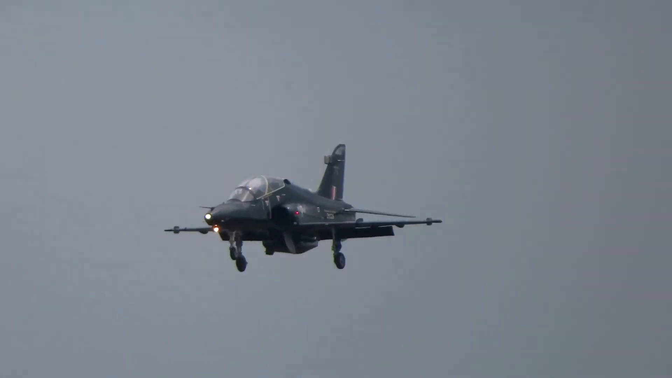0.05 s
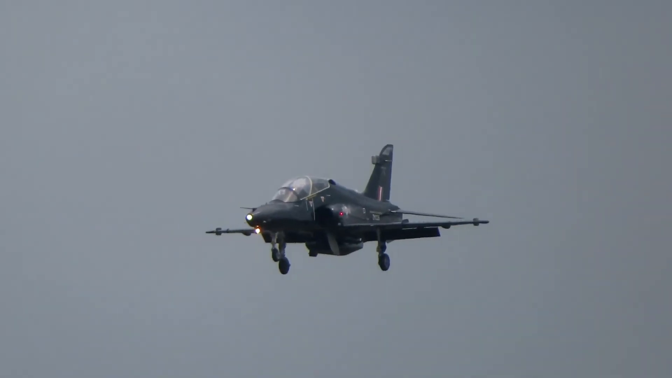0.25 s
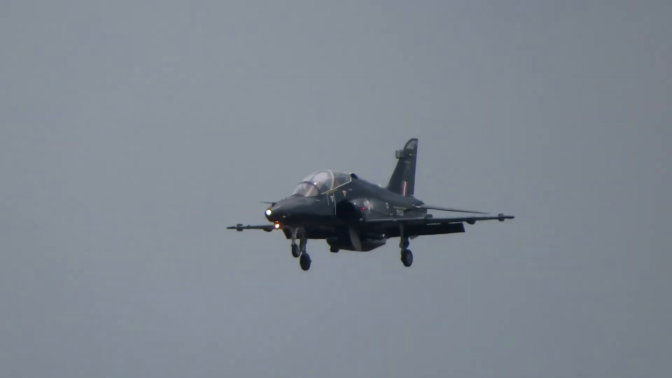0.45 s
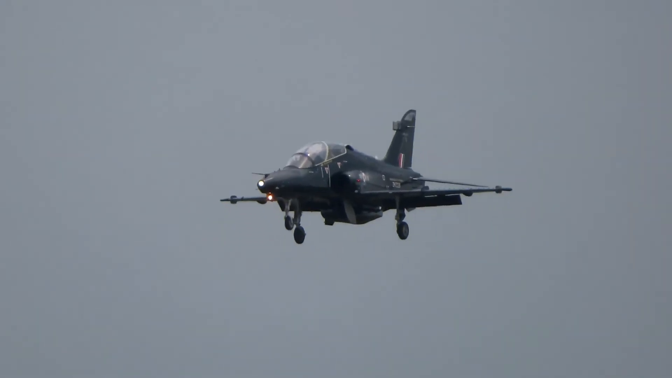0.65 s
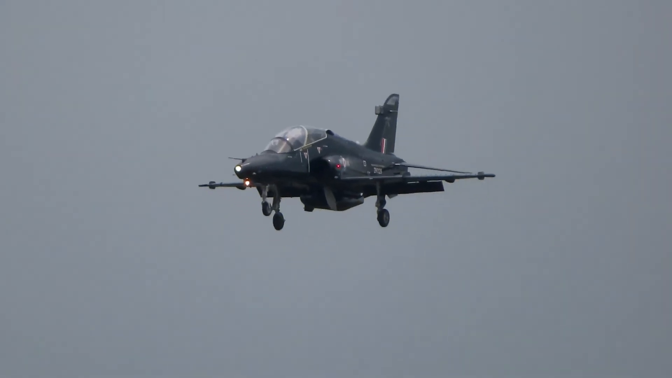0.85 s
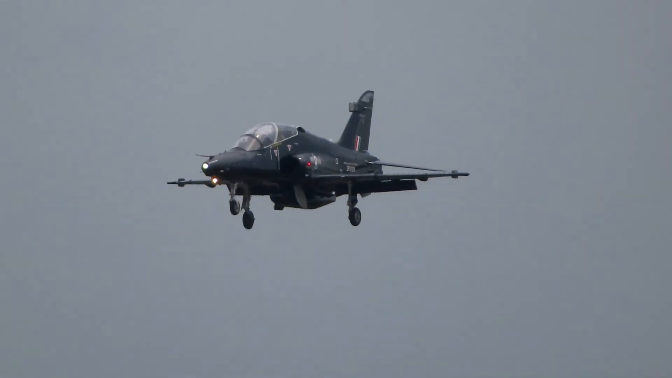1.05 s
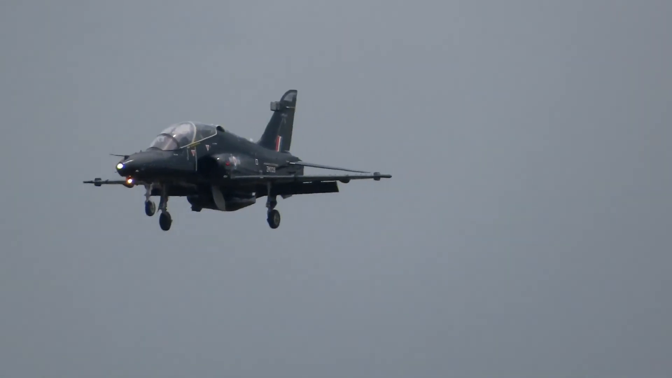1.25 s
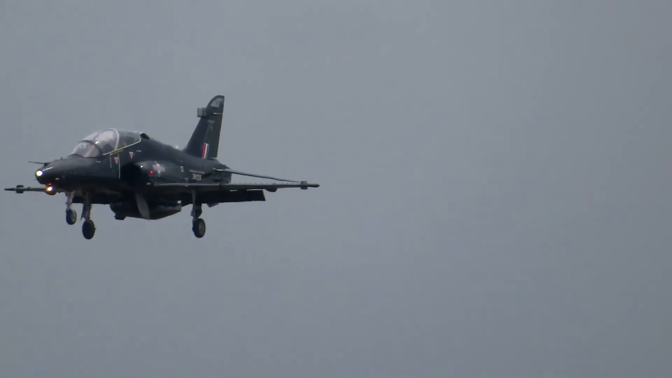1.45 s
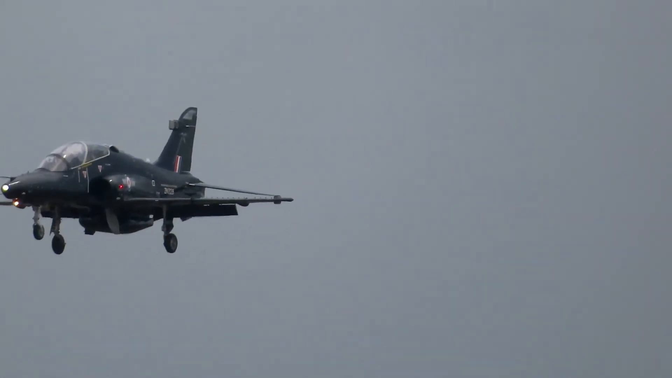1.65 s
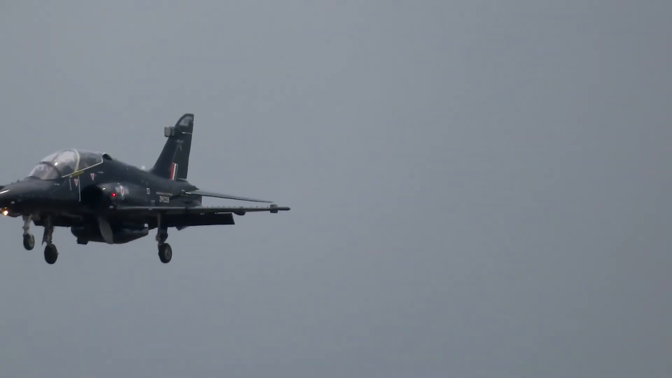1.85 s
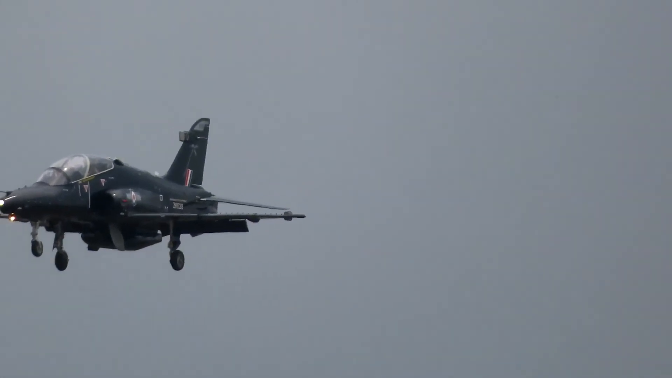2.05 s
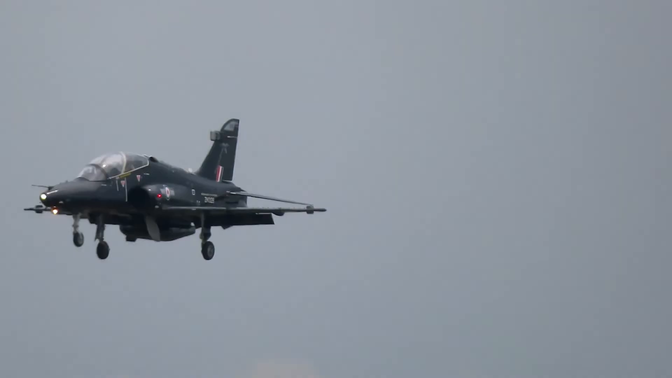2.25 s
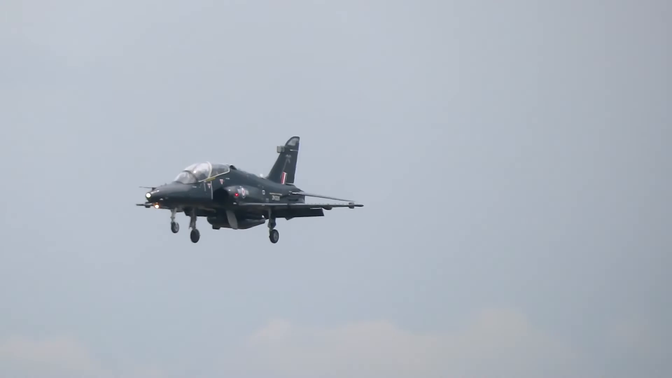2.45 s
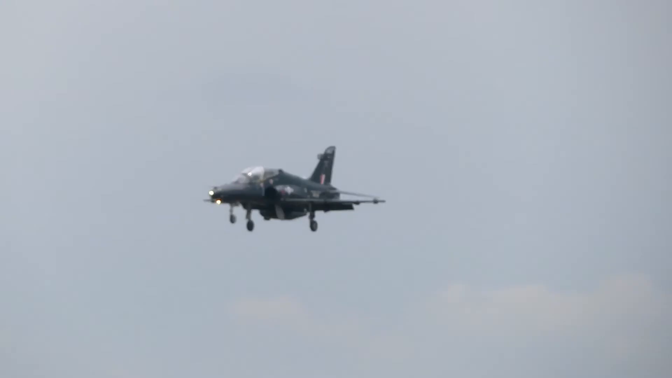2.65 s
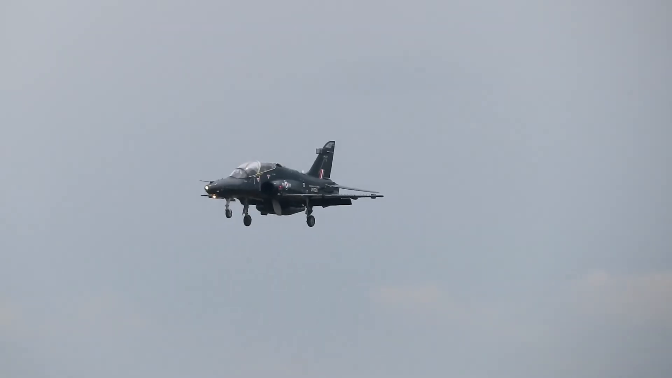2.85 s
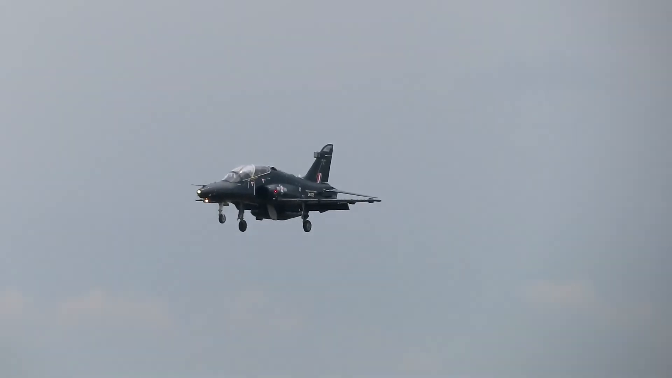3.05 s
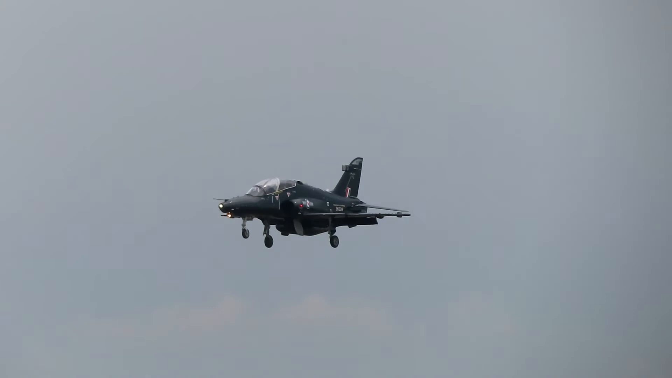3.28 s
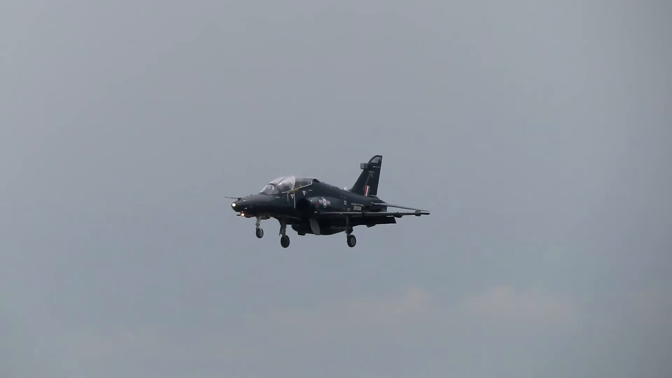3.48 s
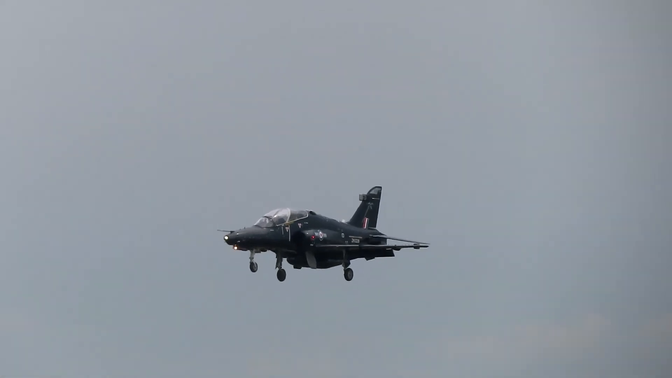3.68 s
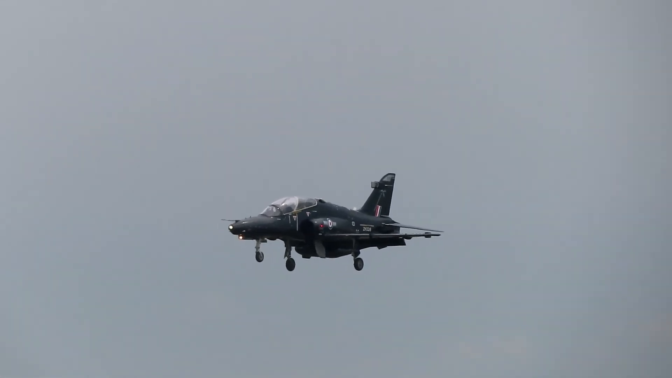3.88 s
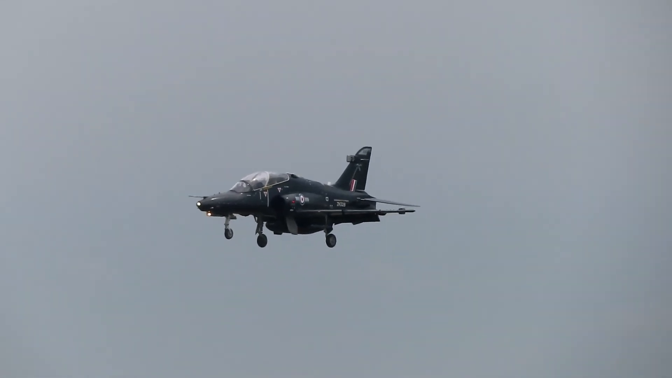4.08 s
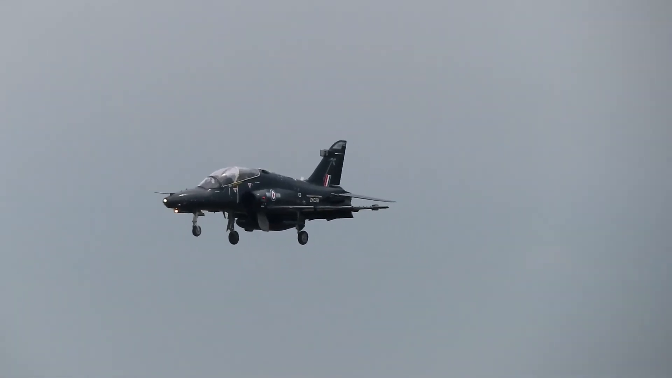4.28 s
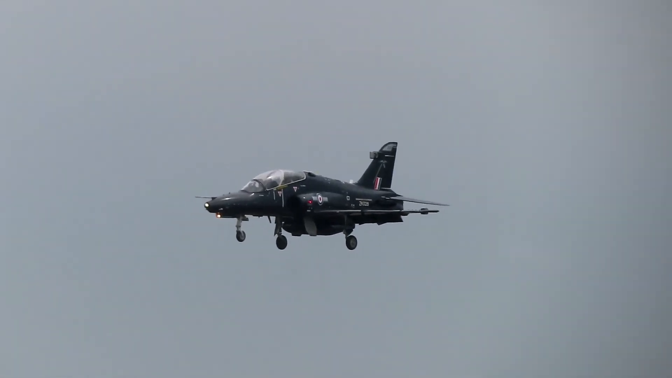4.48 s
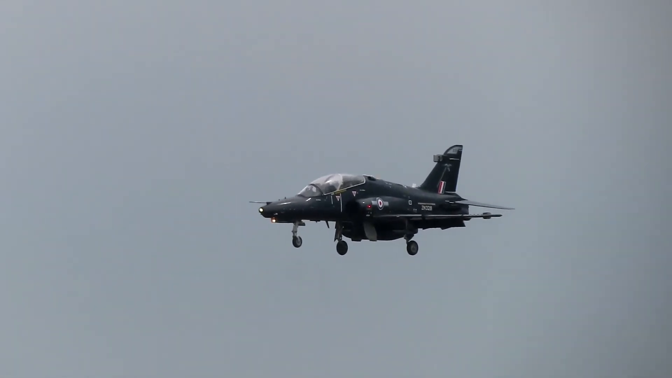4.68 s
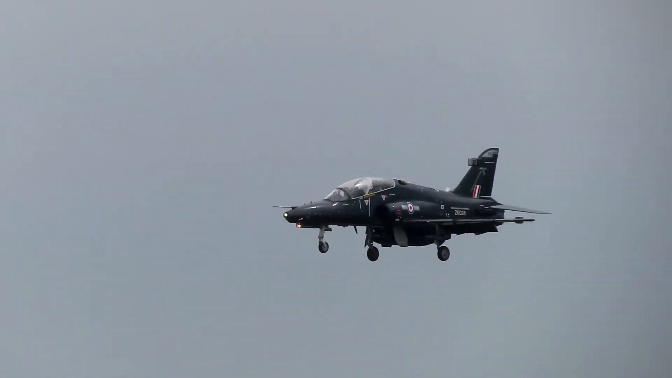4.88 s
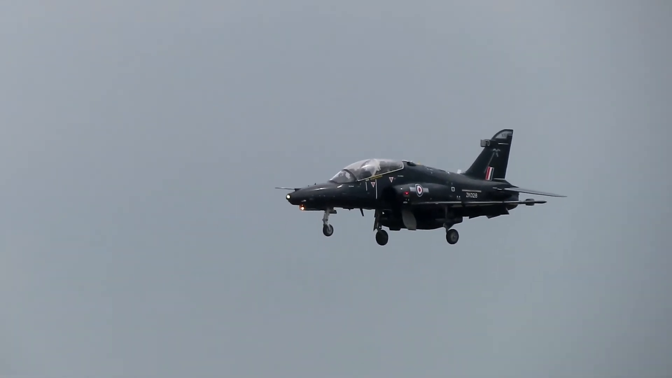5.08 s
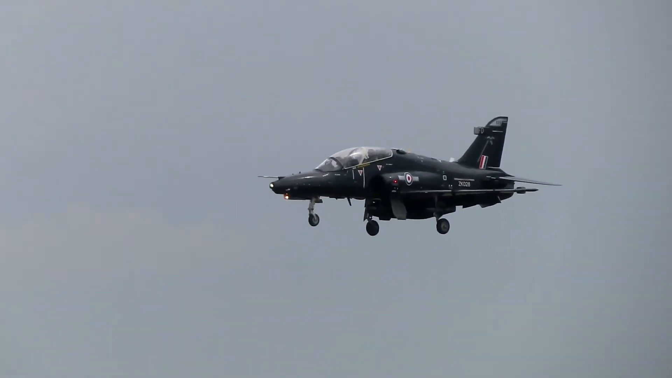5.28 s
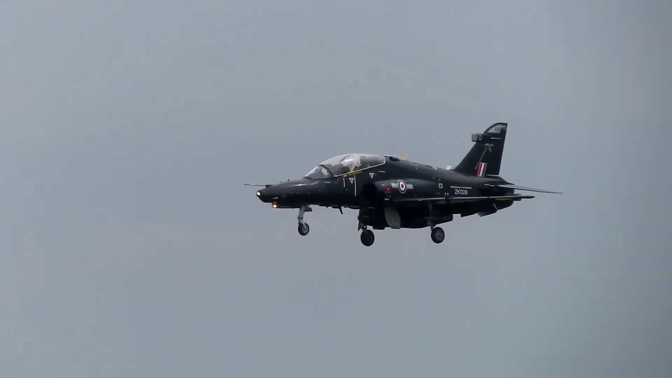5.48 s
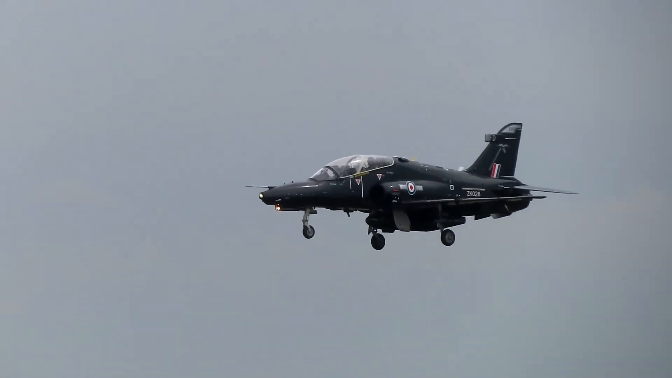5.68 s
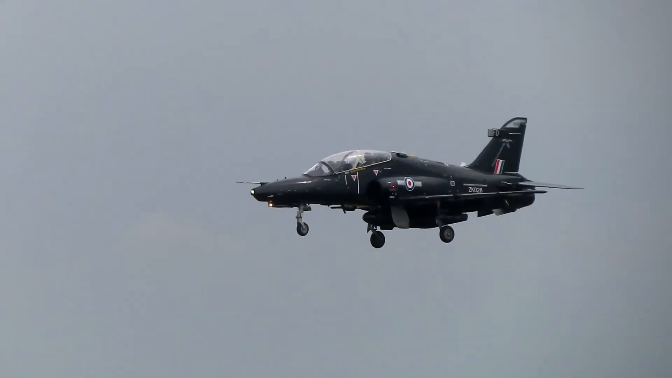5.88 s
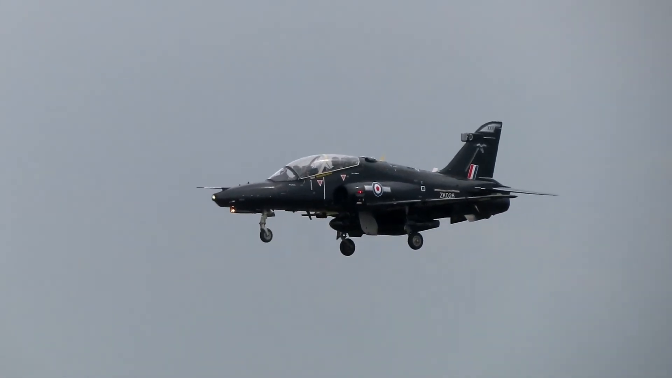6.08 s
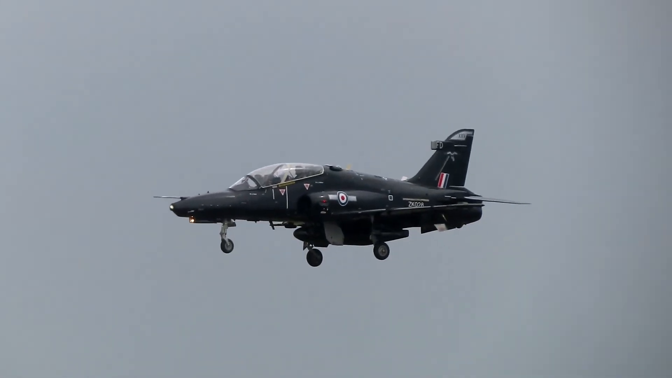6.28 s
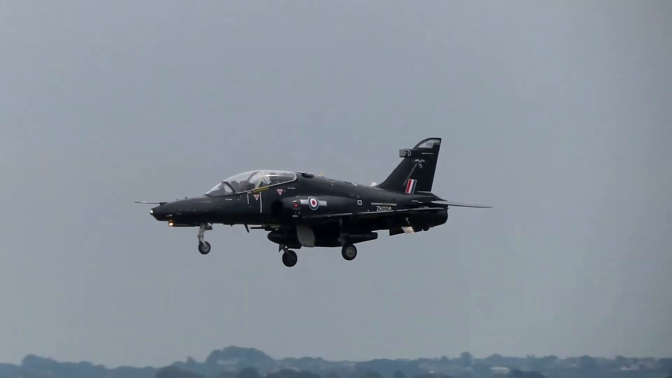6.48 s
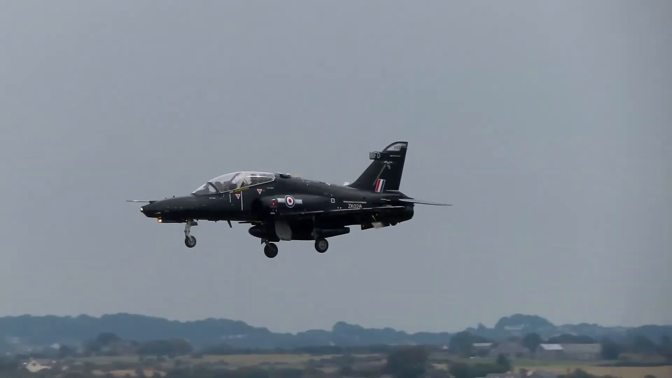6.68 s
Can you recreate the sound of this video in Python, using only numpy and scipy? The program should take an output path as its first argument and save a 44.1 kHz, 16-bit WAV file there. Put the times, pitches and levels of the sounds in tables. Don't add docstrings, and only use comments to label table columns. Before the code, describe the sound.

Outdoor camcorder sound of a small jet on landing approach, nearly centred with modest stereo width. From 0 s a turbulent, airy exhaust roar falls back slightly, its mids and treble flickering in patches, hollowed by reflections off grass. A thin fan whine around 4.5 kHz flutters, climbing to about 5.3 kHz by 2.3 s. Soft wind buffets low down. Tiny shutter clatters occur near 0.4, 1.3, 1.6, 3.1, 3.5, 3.9, 4.2 and 4.7 s. At 2.25 s a zoom button clicks, followed by a faint motor hum until 2.9 s; a tiny falling whistle passes at 2.8 s. The roar thickens from 3.5 s and surges near 5 s. The whine flares sharply, strongest from 5.4 to 6.3 s, slipping slightly lower in pitch. The roar peaks bright and full around 6.3 s amid stronger wind, then eases by 6.7 s.

```python
import sys
import numpy as np
from scipy import signal
from scipy.fft import rfft, irfft, next_fast_len
from scipy.io import wavfile
from scipy.ndimage import uniform_filter1d

SR = 44100
rng = np.random.default_rng(int(sys.argv[2]) if len(sys.argv) > 2 else 0)


def nominal_scale(level):
    x = np.asarray(level, float) / 20
    return 10 ** x


def dump_mix(stems):
    frames = np.atleast_2d(stems).T
    limited = np.clip(frames, -1, 1)
    pcm = np.round(limited * 32767).astype(np.int16)
    wavfile.write(sys.argv[1], SR, pcm)


N = 296793
T = np.arange(N) / SR
COARSE = T[::64]
SIZE = next_fast_len(N)
HZ = np.arange(SIZE // 2 + 1) * SR / SIZE + 1e-3

# [t/s, level/dB, presence of the mids/dB, brightness/(dB per octave)]
APPROACH = [(0.0, -30, 5.5, -2.8), (0.18, -35, 9, -0.2), (0.64, -36, 4, 0.5), (1.36, -31.5, 0.2, -1.03),
            (1.66, -32.5, 8.5, -1.9), (1.88, -28.5, 5, 0.4), (2.44, -35, 11.5, -1.4),
            (2.76, -33.5, 0.7, -0.14), (3.34, -32, -1, -0.6), (3.56, -30, 0.1, 0),
            (4.08, -27.0, -0.5, -0.7), (4.32, -30, 0.5, 0.1), (4.48, -29.5, -5.5, -0.74),
            (5.02, -20, -4, 1.1), (5.18, -23, 3, 1.1), (5.52, -19.5, -7.5, 0.75), (6.32, -15.5, -0.6, 1.1),
            (6.73, -23, -4, -0.9)]
# [t/s, f/Hz, steady level/dB]
FAN_TONE = [(0.0, 4610, -54), (0.87, 4440, -58), (1.0, 4560, -63), (1.15, 4700, -61), (1.4, 5030, -59),
            (1.9, 5120, -58), (2.3, 5300, -58), (2.62, 5275, -67), (2.95, 5030, -60), (3.35, 5055, -63),
            (3.65, 5020, -55), (4.25, 4980, -51), (4.45, 5090, -53), (4.73, 5345, -52), (5.08, 5360, -45),
            (5.36, 5100, -40.5), (5.95, 4975, -38), (6.73, 4884, -42)]


def roar():
    # [f/Hz, level/(dB per Hz)]
    jet_spectrum = [(30, -34), (70, -16.5), (150, -3.5), (300, -2.5), (800, -2.5), (1500, -2), (2200, -7.5),
                    (3000, -15), (4200, -20), (4900, -23.5), (5500, -31), (6200, -43.5), (9000, -76)]
    # [f/Hz, level/dB]
    spread = [(60, -41), (200, -65.5), (500, -30.5), (1000, -35), (2200, -21), (3600, -25), (6000, -20.5),
              (10000, -8.5)]
    # [lowest f/Hz, highest f/Hz]
    roar_bands = [(130, 500), (600, 1200), (1300, 2800), (3000, 4300)]
    roar_trim = [0.75, -1.6, -3, -12.5]
    power = nominal_scale(2 * colour(jet_spectrum, HZ)) / len(HZ)
    trim_db = [db - 10 * np.log10(power[(HZ > low) & (HZ < high)].sum())
               for db, (low, high) in zip(roar_trim, roar_bands)]
    centres = np.log2([np.sqrt(low * high) for low, high in roar_bands])
    white = rfft(rng.standard_normal((2, SIZE))) * np.sqrt(power * len(HZ))
    white[1] *= nominal_scale(colour(spread, HZ))
    calm = np.interp(COARSE, [5.6, 6.2], [1, .45])
    puff, patch = drift(40), drift(10)
    total = 0
    for octave in np.arange(6, 12.9, 1 / 6):
        window = np.cos(np.pi / 2 * np.clip(6 * (np.log2(HZ) - octave), -1, 1)) ** 2
        level_db = np.interp(octave, centres, trim_db) + heard(2 ** octave)
        patch = 0.75 * patch + 0.7 * drift(7.3)
        shimmer = calm * np.clip((octave - 8.5) / 2.64, .15, 1.2)
        flicker_db = shimmer * (.7 * puff + .55 * patch + 2.2 * drift(35)) - .9
        band = irfft(white * window, SIZE)[:, :N]
        total = total + band * np.interp(T, COARSE, nominal_scale(level_db + flicker_db))
    return total


def heard(hz):
    s, level_db, presence_db, tilt_db = np.transpose(APPROACH)
    presence_hz, presence_octaves, pivot_hz = 1237, 0.94, 980
    presence = np.exp(-(np.log2(hz / presence_hz) / presence_octaves) ** 2)
    db = level_db + presence_db * presence + tilt_db * np.log2(max(hz, 150) / pivot_hz)
    return np.interp(COARSE, s, db) + pockets(hz)


def pockets(hz):
    # [t/s, half length/s, f/Hz, level/dB]
    air_pockets = [(0.295, 0.053, 4470, 5), (0.352, 0.17, 517, 5.5), (0.406, 0.11, 3180, 8.5),
                   (0.61, 0.48, 825, -4.5), (0.107, 0.087, 2900, 5), (0.9, 0.26, 1410, 4),
                   (1.15, 0.18, 2520, 4.5), (1.326, 0.088, 1655, -4), (1.69, 0.12, 3600, -3.5),
                   (2.04, 0.3, 536, -3.5), (2.033, 0.24, 3000, 6), (2.55, 0.23, 3070, 8),
                   (2.539, 0.098, 442, 2.5), (2.58, 0.17, 4500, -4), (2.927, 0.14, 3800, 5),
                   (3.1, 0.12, 840, 5), (3.194, 0.22, 460, -8), (3.418, 0.095, 4400, 0.5),
                   (4.2, 0.12, 1570, 3.5), (4.22, 0.072, 217, 7), (4.214, 0.31, 556, -8.5),
                   (4.49, 0.1, 897, 6.5), (4.503, 0.17, 152.4, 6), (5.114, 0.15, 3900, -3.5),
                   (5.155, 0.14, 1930, -5.5), (5.17, 0.26, 780, 2), (5.394, 0.078, 2900, 3.5),
                   (5.859, 0.13, 2740, -1.5), (5.8, 0.53, 676, 2.5), (6.293, 0.06, 206, -11)]
    # [t/s, half length/s, f/Hz, level/dB, climb/(octaves per s)]
    air_fronts = [
        (1.675, 0.32, 1900, 2, 4),
        (5.1, 0.17, 1050, 2.5, 1.5),
        (6.07, .2, 2030, 3, 1.8),
        (6.24, 0.06, 4800, 5.5, -14),
        (.02, 0.18, 1600, 3.5, -6),
    ]
    pocket_octaves = 0.55
    rows = [*[(*row, 0) for row in air_pockets], *air_fronts]
    s, half_s, centre_hz, db, climb = np.transpose(rows)[..., None]
    late = COARSE - s
    off = np.log2(hz / centre_hz) - climb * late
    return (db * np.exp(-(off / pocket_octaves) ** 2 - (late / half_s) ** 2)).sum(axis=0)


def rush():
    slope = nominal_scale(-26 * np.log2(1 + HZ / 2500.0)) / np.sqrt(1 + (5500 / HZ) ** 16)
    air = unit(shaped(rng.standard_normal((2, N)), slope / (1 + (HZ / 7950.0) ** 6)))
    rush_hz, rush_db = 6500, -31
    growth = 1.03
    flare_share = 0.19
    flare_db = flares()
    jet_db = growth * (heard(rush_hz) + 28) - 28
    db = rush_db + np.interp(T, COARSE, jet_db + 2.0 * drift(35))
    flare = flare_share * (flare_db - uniform_filter1d(flare_db, SR // 2))
    return air * nominal_scale(db + flare + 2.0 + np.array([[0], [-11.5]]))


def fan():
    hz, db = curve(FAN_TONE)[0], flares()
    spool_s = .14
    phase = 2 * np.pi * np.cumsum(uniform_filter1d(hz, int(spool_s * SR))) / SR
    depth_db = np.interp(T, [4.2, 4.6, 5.25, 5.4, 5.9, 6.05], [3.5, 2.5, 2.5, 4.5, 4.5, 2.3])
    veil_db = np.interp(T, [5.15, 5.3, 5.9, 5.97], [0, -5, -6, 0])
    tone = np.sqrt(2) * np.sin(phase + .4 * depth_db * walk(60))
    tone = tone * nominal_scale(db + veil_db + depth_db * (walk(64) - .5))
    skirt = noise(5, 70) * np.sin(phase + 1) * nominal_scale(-3.5 + veil_db)
    octave_db = 1.4 * uniform_filter1d(db, SR // 4) - 19.5
    octave = noise(5, 320) * np.sin(2 * phase) * nominal_scale(octave_db)
    intake_db = -1 + 3.0 * walk(40) + np.interp(T, COARSE, pockets(4600))
    intake = noise(5, 380, order=4) * np.sin(.94 * phase) * nominal_scale(intake_db)
    return tone + octave + swish() + (skirt + intake) * nominal_scale(uniform_filter1d(db, SR // 20))


def flares():
    # [t/s, peak level/dB, hold/s]
    tone_flares = [(.09, -44, 0.028), (.3, -39, 0), (.69, -46.5, 0), (.85, -46.5, 0.0066), (1.1, -44, 0),
                   (2.075, -49, 0), (2.3, -43, 0), (2.47, -51.5, 0.02), (2.58, -54, 0.0077),
                   (2.65, -50.5, 0.028), (3.82, -46, 0), (4.07, -43, 0.0099), (4.535, -43, 0.03),
                   (4.669, -41.5, 0.047), (4.8, -41, 0), (4.854, -40, 0.042), (4.964, -33, 0.018),
                   (5.07, -39.5, 0.046), (5.259, -41, 0.0024), (5.435, -29.5, 0), (5.502, -31, 0),
                   (5.607, -28.5, 0), (5.737, -33, 0.017), (5.832, -30, 0.015), (5.976, -27.5, 0),
                   (6.031, -29, 0), (6.162, -31, .18), (6.39, -31, 0.035), (6.544, -36, 0.067),
                   (6.68, -33, 0.0028)]
    s, peak_db, hold_s = np.transpose(tone_flares)
    flare_db = swells(s, peak_db, hold_s[:, None], rise_db_s=422, fall_db_s=327)
    return np.maximum(curve(FAN_TONE)[1], flare_db)


def swish():
    late = T - 2.83
    start_hz, drop_hz_s, half_s = 4750, 8950, .035
    whistle = np.sin(2 * np.pi * late * (start_hz - drop_hz_s * late / 2))
    return whistle * nominal_scale(-42) * np.exp(-(late / half_s) ** 2)


def ground(x):
    # [t/s, grass delay/ms, grass strength/(0 to 1), body delay/ms]
    bounces = [(0, 1.8, 0, 0.85), (.6, 1.48, 0.37, 0.89), (1.2, 1.55, 0.07, 0.91), (2, 1.624, 0.74, 0.907),
               (2.7, 1.65, 1, 0.94), (3.5, 1.615, 0.7, 0.89), (4.2, 1.52, 0.68, 1.025), (4.6, 1.8, 0.68, 1),
               (5, 1.583, 0.47, 0.992), (5.8, 1.79, 0.35, 1.07), (6.3, 1.75, 0.7, 0.99),
               (6.73, 1.7, 0.23, 1.03)]
    grass_ms, strength, body_ms = curve(bounces)
    dull = shaped(x, np.sqrt(0.039 + 0.69 / (1 + (HZ / 1000.0) ** 4)))
    bright = shaped(x, .39 / np.sqrt((1 + (1700 / HZ) ** 6) * (1 + (HZ / 4800) ** 8)))
    near = T - (grass_ms - .1 + .035 * walk(12)) / 1000
    far = T - (grass_ms + .1 + .035 * walk(12)) / 1000
    bounce = np.array([np.interp(near, T, d) + np.interp(far, T, d) for d in dull]) / 2
    slap = np.array([np.interp(T - body_ms / 1000, T, b) for b in bright])
    return x - strength * bounce + slap


def wind():
    # [t/s, peak level/dB, part that differs between the ports/dB]
    gusts = [(0.0, -26, -47), (.99, -38, -75), (1.14, -35.5, -66), (1.31, -40, -76), (1.42, -36.5, -74),
             (1.61, -39, -67), (1.85, -30, -70), (2.02, -34.5, -58), (2.19, -26.5, -55), (2.38, -32.5, -81),
             (2.5, -28.5, -52), (2.81, -38.5, -85), (3.04, -39, -90), (3.18, -41, -90), (3.6, -37, -70),
             (3.78, -43, -90), (4.16, -36, -52), (4.46, -38, -51), (4.67, -28.5, -44), (4.85, -32, -40),
             (4.95, -31, -50), (5.23, -39, -50), (5.55, -28, -40), (5.72, -37, -40), (5.88, -27.5, -44),
             (6.13, -28, -36), (6.22, -22, -23), (6.35, -22.5, -27), (6.48, -27.5, -28), (6.69, -39, -50)]
    s, db, unlike_db = np.transpose(gusts)
    level_db = curve(APPROACH)[0]
    rise_db_s, fall_db_s = 221, 191
    breeze_db = -47.5 + 1.2 * (level_db + 27)
    eddy_db = -70 + 2.4 * (level_db + 27.5)
    buffet_db = np.maximum(swells(s, db, 0, rise_db_s, fall_db_s), breeze_db)
    unlike_db = np.maximum(swells(s, unlike_db, 0, rise_db_s, fall_db_s), eddy_db)
    buffet = noise(40, 123, order=3) * nominal_scale(buffet_db + 3.0)
    return buffet, noise(45, 170) * nominal_scale(unlike_db + 2.3 * walk(20))


def camcorder():
    # [t/s, f/Hz, level/dB]
    zoom = [(2.3, 400, -62), (2.4, 436, -51), (2.46, 455, -50), (2.5, 410, -47), (2.57, 439, -42),
            (2.62, 415, -46), (2.7, 428, -50), (2.78, 427, -58), (2.9, 410, -72)]
    # [t/s, peak level/dB]
    button = [
        (2.240, -30),
        (2.256, -25),
        (2.264, -25.5),
        (2.270, -27),
    ]
    hz, db = curve(zoom)
    phase = 2 * np.pi * np.cumsum(hz * (1 + .015 * walk(25))) / SR
    motor = np.sin(phase) + nominal_scale(-4 + 3.1 * walk(20)) * np.sin(2 * phase)
    motor = motor + nominal_scale(-26.5) * noise(700, 1600)
    running = (T > 2.3) * (T < 2.9)
    press = shaped(clicks(button, 300, 2600, 0.0051), 1 / (1 + (HZ / 3900.0) ** 4))
    return np.sqrt(2) * motor * nominal_scale(db) * running + 0.66 * press


def cameras():
    # [t/s, peak level/dB]
    shutter = [(0.464, -46.5), (1.3806, -44), (1.682, -48), (3.1823, -43), (3.5606, -41.5), (3.923, -42),
               (4.276, -42.5), (4.7136, -41.5)]
    # [t from last blade/s, level/dB]
    shutter_parts = [
        (-.124, -7),
        (-.105, -20),
        (-.048, -4),
        (0, 3),
        (.011, -4),
        (.018, -16),
    ]
    # [t/s, level/dB, hold/s]
    focus_moves = [(.67, -72, .01), (0.738, -70, .01), (.81, -67.5, .19), (1.55, -77, .11),
                   (3.98, -75, .25)]
    ticks = [(s + lag, db + part_db - 7.5) for s, db in shutter for lag, part_db in shutter_parts]
    s, db, hold_s = np.transpose(focus_moves)
    focus_db = swells(s, db, hold_s[:, None], rise_db_s=501, fall_db_s=501)
    focus = noise(13500, 15200, order=8) * nominal_scale(focus_db + 2.5 * walk(29))
    return clicks(ticks, 4000, 11000, 0.0021), focus


def hiss():
    # [f/Hz, level/(dB per Hz)]
    hiss_spectrum = [(2000, -17.5), (6000, -8), (9000, -0.5), (12000, -5), (15500, -10)]
    duck_db = -1.1 * np.clip(uniform_filter1d(curve(APPROACH)[0], SR // 2) + 28, 0, 20)
    preamp = unit(shaped(rng.standard_normal((2, N)), nominal_scale(colour(hiss_spectrum, HZ))))
    return preamp * nominal_scale(-68.5 + duck_db)


def clicks(rows, lo_hz, hi_hz, decay_s):
    s, db = np.transpose(rows)
    marks = np.zeros(N)
    np.add.at(marks, (s * SR).astype(int), nominal_scale(db))
    decay = np.exp(-1 / (decay_s * SR))
    return signal.lfilter([1], [1, -decay], marks) * noise(lo_hz, hi_hz)


def swells(s, db, hold_s, rise_db_s, fall_db_s):
    late = COARSE - s[:, None]
    top = db[:, None] - rise_db_s * np.maximum(-late, 0) - fall_db_s * np.maximum(late - hold_s, 0)
    return np.interp(T, COARSE, top.max(axis=0))


def drift(rate):
    k = int(SR / 64 / rate)
    steps = np.repeat(rng.standard_normal(480), k)
    smooth = uniform_filter1d(uniform_filter1d(steps, k), k)[:len(COARSE)]
    return unit(smooth - smooth.mean())


def walk(rate):
    return np.interp(T, COARSE, drift(rate))


def noise(lo_hz, hi_hz, order=2):
    low_edge = 1 + (lo_hz / HZ) ** (2 * order)
    high_edge = 1 + (HZ / hi_hz) ** (2 * order)
    return unit(shaped(rng.standard_normal(N), 1 / np.sqrt(low_edge * high_edge)))


def curve(table):
    s, *columns = np.transpose(table)
    return [np.interp(T, s, c) for c in columns]


def colour(table, hz):
    f, db = np.transpose(table)
    return np.interp(np.log(hz), np.log(f), db)


def shaped(x, gain):
    return irfft(rfft(x, SIZE) * gain, SIZE)[..., :N]


def unit(x):
    return x / np.sqrt(np.mean(x ** 2))


def scene():
    # [f/Hz, width/Hz, level/dB]
    resonances = [(446, 240, -2), (889, 200, 3), (1220, 320, -7), (1988, 330, -4.5), (3830, 260, -2.5),
                  (4370, 170, -3.5)]
    housing = nominal_scale(sum(db / (1 + (2 * (HZ - hz) / width) ** 2) for hz, width, db in resonances))
    aircraft = ground(roar()) + rush() + fan() * np.array([[1], [.08]])
    jet, scattered = shaped(aircraft, housing)
    lag_us, tilt_db = 11.5, -0.32
    offset = np.exp(-1j * np.pi * HZ * lag_us * 1e-6) * nominal_scale(tilt_db * np.log2(1 + HZ / 400.) / 2)
    buffet, eddies = wind()
    ticks, focus = cameras()
    mid = buffet + ticks + focus
    side = scattered + eddies + camcorder() + .55 * ticks + .6 * focus
    left = shaped(jet, offset) + mid + side
    right = shaped(jet, 1 / offset) + mid - side
    return np.array([left, right]) + hiss()


def band_limit(x):
    return signal.sosfilt(signal.butter(12, 15760, fs=SR, output="sos"), x)


def record(dry):
    return band_limit(dry)


dry = scene()
out = record(dry)
dump_mix(out)
```